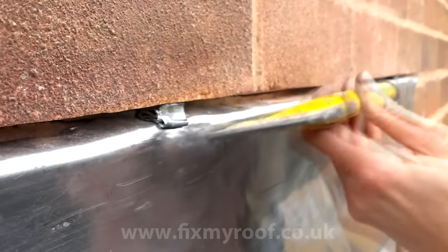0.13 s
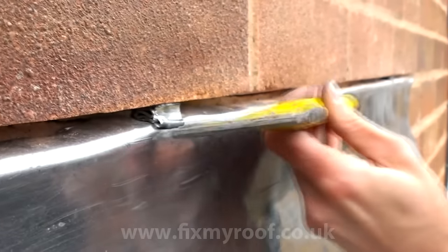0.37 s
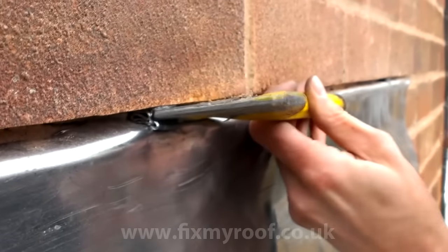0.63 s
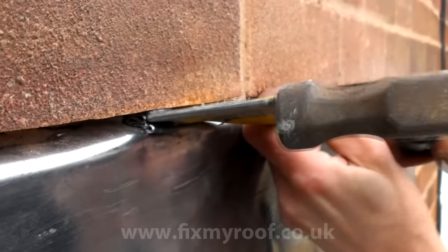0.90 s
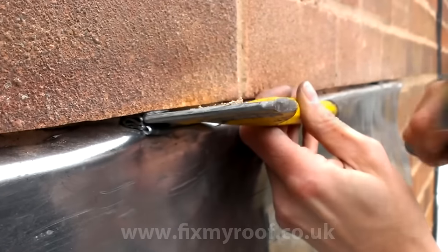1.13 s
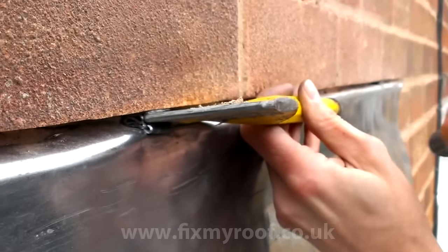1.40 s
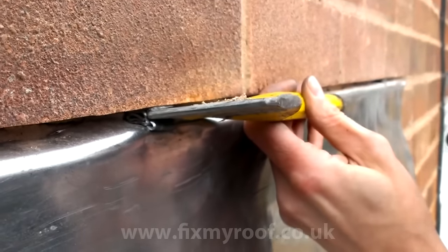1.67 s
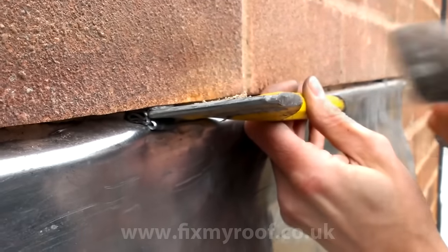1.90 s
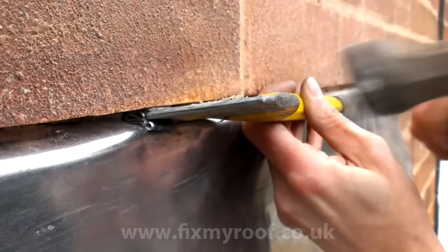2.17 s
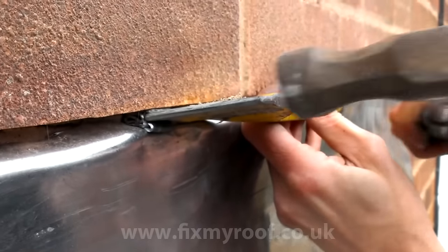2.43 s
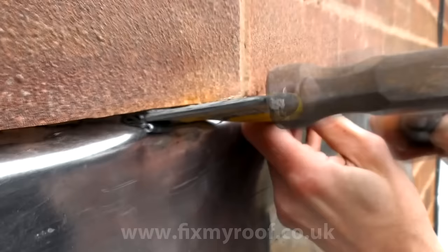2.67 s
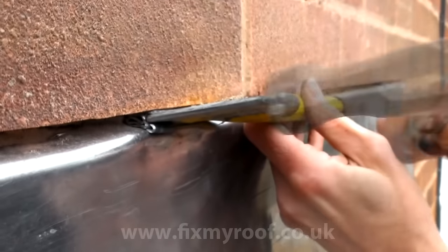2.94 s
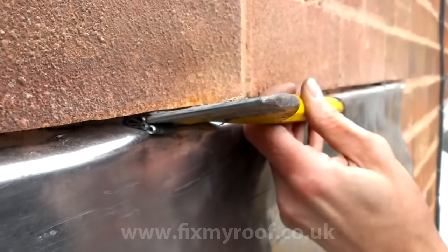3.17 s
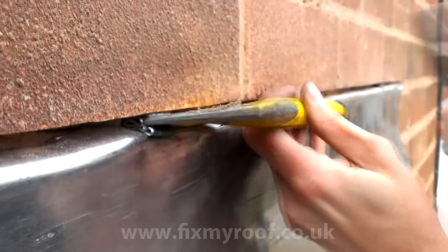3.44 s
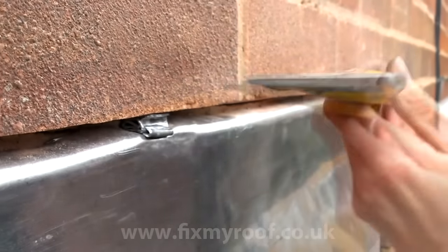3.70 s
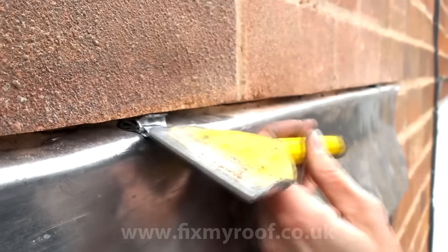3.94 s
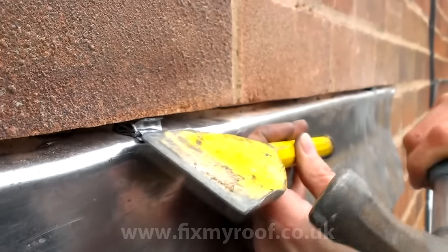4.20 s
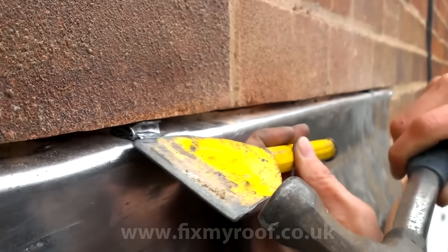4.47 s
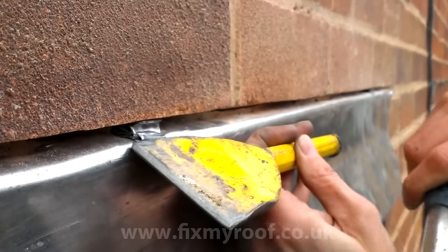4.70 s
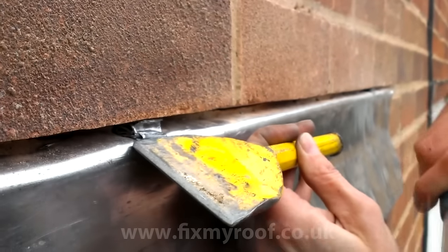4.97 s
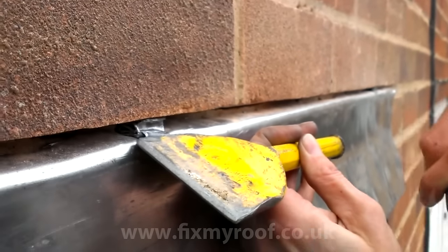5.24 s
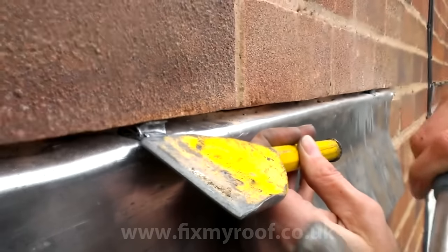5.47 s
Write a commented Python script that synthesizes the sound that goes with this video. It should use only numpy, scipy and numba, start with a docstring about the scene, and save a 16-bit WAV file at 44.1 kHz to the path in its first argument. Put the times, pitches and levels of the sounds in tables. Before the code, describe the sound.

Outdoors on a roof by a brick wall, heard close in one channel, over very faint distant traffic. From 0 to 0.4 s, soft dull hand bumps on sheet lead with light rubbing; around 0.7 s a short scrape and small blade taps on brick. At 0.96 s a hammer begins hitting a steel chisel, a blow every 0.3 s until 3.35 s: hard bright clack, short metallic ring, quick duller rebound, gritty mortar crunch and low roof thud. Small lead bumps sit between early blows. After 3.4 s echoes die into near quiet, with a faint tap at 3.6 s. From 4.15 to 4.85 s, low lead knocks and sliding rumble, with a stronger brick knock at 4.34 s. Three blows at 4.92, 5.19 and 5.47 s grow louder, more ringing and less thuddy. Short echoes return from nearby walls; loud peaks are compressed, and the background dips just before them.

```python
"""Hands knock softly on a lead sheet over far traffic hum; then a hammer drives a chisel into a brick joint on a roof.
Blows and rebounds ring steel modes (fading sine waves), shake the roof and crunch mortar, made of filtered noise.
The chisel alone also knocks the brick, and hands slide on the lead or drag the blade, as shaped noise.
Delayed copies and a fading noise tail give the echoes of nearby walls.
A look-ahead limiter holds the peaks down, so the background dips just before the loudest ones."""
import sys
import numpy as np
from scipy import signal
from scipy.fft import rfft, irfft
from scipy.io import wavfile
from scipy.ndimage import uniform_filter1d, minimum_filter1d
from numba import njit

SR = 44100
rng = np.random.default_rng(int(sys.argv[2]) if len(sys.argv) > 2 else 0)


def voltage_ratio(decibels):
    """Convert decibels (scalar or array-like) to amplitude ratios, 20 dB per decade."""
    exponent = np.asarray(decibels, float) / 20
    return 10 ** exponent


def persist_wave(psi):
    """Save psi, clipped to +-1, as 16-bit WAV."""
    counts = np.round(np.clip(psi, -1, 1) * 32767).astype(np.int16)
    wavfile.write(sys.argv[1], SR, np.atleast_2d(counts).T)


N = 246959  # length in samples


def colour(x, points):
    """Filter by (frequency in Hz, gain in dB) points, joined along a log frequency scale."""
    hz, db = np.transpose(points)
    n = x.shape[-1]
    f = np.maximum(np.arange(n // 2 + 1) * SR / n, 1)
    gain = voltage_ratio(np.interp(np.log(f), np.log(hz), db))
    return irfft(rfft(x) * gain, n)


def unit(x):
    """Scale to an rms (average strength) of 1."""
    return x / np.sqrt(np.mean(x ** 2))


def fade(t, t60):
    """Exponential decay that falls 60 dB in t60 seconds."""
    return np.exp(-np.log(1000) * t / t60)


def add(track, s, sound):
    """Mix a sound into the track at s seconds, cut off at the track's end."""
    start = int(s * SR)
    part = track[..., start:start + sound.shape[-1]]
    part += sound[..., :part.shape[-1]]


def walk(rate):
    """Random curve that moves to a new level rate times a second; its spread is about 1."""
    k = int(SR / rate)
    levels = np.repeat(rng.standard_normal(N // k + 1), k)
    return unit(uniform_filter1d(levels, k)[:N])


def along(strokes, rise_s, fall_s):
    """Gain over time: each (start, length, dB) stroke rises, holds and falls away."""
    t = np.arange(N) / SR
    gain = np.zeros(N)
    for s, length, db in strokes:
        before = np.maximum(s - t, 0) / rise_s
        after = np.maximum(t - s - length, 0) / fall_s
        gain += voltage_ratio(db) * np.exp(-before ** 2 - after ** 2)
    return gain


def dull(x, db):
    """A longer contact loses db per octave above 4200 Hz; a negative value brightens."""
    x = np.pad(x, [(0, 0), (64, 64)])  # room for the filter to spread
    return colour(x, [(20, 0), (4200, 0), (16800, -2 * db), (22050, -2 * db)])[:, 64:]


def ring(modes, seconds, life, scatter_db, detune, cycles):
    """One strike on a set of modes; each lands elsewhere, so levels, pitch and phase differ a little."""
    t = np.arange(int(seconds * SR)) / SR
    hz, db, t60 = np.array(modes).T[:, :, None]
    level, pitch, phase = rng.standard_normal((3, len(modes), 1))
    # tools move in the hand, so each ring wavers as it dies
    steps = rng.standard_normal((len(modes), len(t) // 400 + 1))
    waver = uniform_filter1d(np.repeat(steps, 400, axis=1), 400)[:, :len(t)]
    waver = waver * np.minimum(t / .06, 1)
    waves = np.sin(2 * np.pi * hz * (1 + detune * pitch) * t + phase)
    waves = waves * fade(t, life * t60) * voltage_ratio(db + scatter_db * (level + 2 * waver))
    # build-up takes the same number of cycles in every mode: the treble speaks first
    waves = waves * (1 - np.exp(-t * hz / cycles)) ** 2
    return waves.sum(axis=0) / np.sqrt(np.sum(voltage_ratio(2 * db)))


def town():
    """Distant traffic: noise in broad bands that swell slowly together and flicker a little alone."""
    # Tone of the hum. Each row: frequency in Hz, relative level in dB.
    hum_tone = [(24, -63), (70, -25), (140, -2.5), (542, -6), (600, -6), (965, -3), (1150, -7),
                (1950, -24.5), (4680, -21.5), (6820, -26), (16000, -27)]
    level_db = -68
    hum = rfft(unit(colour(rng.standard_normal(N), hum_tone)))
    f = np.arange(N // 2 + 1) * SR / N
    swell = walk(0.69)
    out = 0
    for lo, hi in [(20, 200), (200, 500), (500, 1300), (1300, 3500), (3500, 18000)]:  # Hz
        band = irfft(hum * ((f >= lo) & (f < hi)), N)
        out = out + band * voltage_ratio(0.27 * swell + 2.0 * walk(6.8))
    return voltage_ratio(level_db) * out


def walls(x):
    """Sound returns as a few smeared echoes, strongest in the bass, and a diffuse tail between the houses."""
    # Echoes from nearby walls. Each row: delay in seconds, level in dB before the wall's tone.
    bounces = [(.052, -46), (.082, -26.5), (.165, -34.5), (0.216, -51.5)]
    # Tone of the tail between the houses. Each row: frequency in Hz, gain in dB.
    yard_tone = [(100, 5.5), (600, 8), (2000, 8.5), (4000, 2), (8000, 0), (16000, -6)]
    # Tone of the wall echoes. Each row: frequency in Hz, gain in dB.
    wall_tone = [(100, 7.5), (600, -5), (2400, -3.5), (3200, 0), (4000, -7), (4700, -7.5), (7000, -9),
                 (10000, -18.5), (16000, -23.5)]
    yard_db, yard_t60_s = -44.5, 0.94
    t = np.arange(int(.8 * SR)) / SR
    tail = rng.standard_normal(len(t)) * fade(t, yard_t60_s)
    tail = tail * (1 - np.exp(-t / .02)) / np.sqrt(SR / 100)
    echoes = np.zeros(len(t))
    for delay, db in bounces:
        scattered = 0.076 * rng.standard_normal(900) * fade(t[:900], 0.056)  # ledges and window frames
        add(echoes, delay, voltage_ratio(db) * np.append(1, scattered))
    response = voltage_ratio(yard_db) * colour(tail, yard_tone) + colour(echoes, wall_tone)
    return signal.fftconvolve(x, response)[:N]


def knocks():
    """A hand knocks the lead sheet: each soft bump rings three low modes that die quickly."""
    # Knocks on the lead. Each row: start in seconds, level in dB, nominal pitch in Hz.
    bumps = [(0.042, -27, 204), (0.079, -29, 215), (0.109, -27.5, 169), (0.149, -41, 148),
             (0.264, -25, 269), (0.29, -31.5, 204), (0.355, -39.5, 149), (1.034, -25.5, 174),
             (1.138, -36.5, 243), (1.402, -33, 145), (1.446, -24.5, 186), (1.486, -24, 192),
             (4.171, -38, 216), (4.244, -24.5, 187), (4.304, -24, 228.6), (4.316, -21, 177),
             (4.518, -25, 182), (4.64, -20, 253), (4.674, -22.5, 371), (4.699, -34.5, 360),
             (4.734, -21.5, 245), (4.769, -22, 236), (4.841, -30.5, 240)]
    out = np.zeros(N)
    for s, db, hz in bumps:
        sheet = [(hz, 0, .045), (1.4 * hz, -7, .04), (2.5 * hz, -16, .025)]
        add(out, s, voltage_ratio(db) * ring(sheet, 0.095, 0.91, 2.2, 0.029, 0.6))
    return out


def dragging():
    """The blade drags over brick and sleeves rustle: filtered noise with a quick grainy flutter."""
    # Drags and rustles. Each row: start in seconds, length in seconds, level in dB before the flutter.
    strokes = [(0.03, .03, -69), (0.095, 0.014, -71), (0.26, 0.034, -65), (0.7, 0.021, -44),
               (4.25, 0.097, -70)]
    tone = [(100, -20), (400, 27.5), (1500, 14.0), (3000, 2), (6000, 1.5), (16000, -4.5)]  # (Hz, dB)
    drag = unit(colour(rng.standard_normal(N), tone))
    return drag * voltage_ratio(4 * walk(300)) * along(strokes, rise_s=.004, fall_s=.012)


def sliding():
    """Palm and sleeve slide on the lead, which rumbles: low noise of uneven strength."""
    # Slides. Each row: start in seconds, length in seconds, level in dB before the unevenness.
    strokes = [(0.1, 0.21, -63), (1.4, 0.1, -52), (4.2, 0.071, -59.5), (4.3, 0.082, -50),
               (4.5, 0.066, -51.5), (4.64, 0.13, -47.5)]
    tone = [(60, -30), (130, -6), (230, 0), (400, -8), (900, -26), (3000, -50)]  # (Hz, dB)
    rumble = unit(colour(rng.standard_normal(N), tone))
    return rumble * voltage_ratio(3 * walk(40)) * along(strokes, rise_s=.03, fall_s=.025)


def crunch(db):
    """Mortar crumbles: a sharp crack, a grainy hiss that dies fast in the treble, crumbs rattling on lead."""
    # Tone of the grains. Each row: frequency in Hz, relative level in dB.
    grit_tone = [(35, -55.5), (60, -28), (553, 0.5), (2250, -15), (2770, -12), (3040, -8.5), (4030, -1),
                 (4750, -2), (5210, -5.5), (10300, -17), (16000, -67.5)]
    # Tone of the crack. Each row: frequency in Hz, relative level in dB.
    crack_tone = [(300, -11), (3000, -6.5), (9000, -6.5), (13000, -20), (16000, -21)]
    # Tone of the rattling crumbs. Each row: frequency in Hz, relative level in dB.
    rattle_tone = [(200, 11.5), (1000, 17), (2000, 0), (3800, 10.5), (7000, -3), (16000, -22)]
    t = np.arange(int(.3 * SR)) / SR
    uneven = voltage_ratio(2.25 * rng.standard_normal(len(t)))
    grains = unit(colour(rng.standard_normal(len(t)) * uneven, grit_tone))
    low = signal.lfilter([.2], [1, -.8], grains)
    hiss = (grains - low) * fade(t, 0.052) + low * fade(t, 0.16)
    crack = voltage_ratio(7.5) * unit(colour(rng.standard_normal(len(t)), crack_tone)) * fade(t, 0.009)
    patchy = voltage_ratio(4 * np.repeat(rng.standard_normal(len(t) // 100 + 1), 100)[:len(t)])
    crumbs = unit(colour(rng.standard_normal(len(t)) * patchy, rattle_tone))
    return voltage_ratio(db) * (crack + hiss + voltage_ratio(-26) * crumbs * fade(t, .5))


def contact(under, chisel_db, under_db, grit_db, freedom):
    """Two rows: the chisel's ring; then the grit with whatever lies under it, taking the push."""
    # Ringing notes of the chisel. Each row: frequency in Hz, relative level in dB,
    # time to fall 60 dB in seconds before freedom shortens it.
    chisel_modes = [(1114, -16.5, .1), (1317, -14, 0.18), (1550, -5.5, .08), (2742, 3.5, 0.13),
                    (3377, 1.5, 0.037), (4200, -7, .07), (5608, 6.5, 0.14), (6190, -9.5, 0.056),
                    (7346, -6.5, 0.15), (8790, -11, .14), (9776, -12, 0.2), (11330, -12, .15),
                    (12650, -13, .11), (14000, -15, .1)]
    grip_s = 0.17  # the hand closes on the chisel again and stops its ring
    chisel = ring(chisel_modes, .3, max(freedom, .1), 1.5, .0005, 2.5)
    chisel = chisel * np.exp(-(np.arange(len(chisel)) / (grip_s * SR)) ** 4)
    push = ring(under, .3, 0.73, 2.5, 0.04, 0.42)
    return np.array([voltage_ratio(chisel_db) * chisel, crunch(grit_db) + voltage_ratio(under_db) * push])


def touches():
    """The chisel alone touches the wall and knocks the brick with a little grit. Rows as in contact."""
    # Touches. Each row: start in seconds, brick knock in dB, chisel ring in dB before the blade's tone,
    # freedom to ring (1 is loose), dullness in dB per octave.
    taps = [(0.6663, -25.5, -54, 0.96, 0), (0.6987, -20, -37.5, 0.4, 16.5), (0.716, -33, -45.5, 0.47, 25),
            (3.6192, -28.5, -40.5, 0.5, -0.5), (4.3422, -12, -36, 0.49, 31), (4.418, -29, -47, 0.24, 41),
            (4.4911, -26.5, -38, 0.84, 5.5), (4.6375, -39.5, -79, 0.36, 26), (4.673, -34, -66, .4, 25),
            (4.9973, -26, -35.5, 0.23, 24)]
    # Notes of the brick. Each row: frequency in Hz, relative level in dB,
    # time to fall 60 dB in seconds before contact shortens it.
    brick_modes = [(363, 1, 0.16), (691.4, 8.5, 0.094), (958, 21, 0.0096), (1180, -4, 0.049),
                   (1500, -11, 0.01), (1950, -6.5, 0.075), (4170, -7.5, 0.053)]
    # Touched at the blade, the modes share the ring differently. Each row: frequency in Hz, gain in dB.
    tip_tone = [(1500, 16.5), (2742, 4.5), (5608, -13), (7346, 5), (9700, -13)]
    grit_under_knock_db = -29
    out = np.zeros((2, N))
    for s, brick_db, chisel_db, freedom, dull_db in taps:
        touch = contact(brick_modes, chisel_db, brick_db, brick_db + grit_under_knock_db, freedom)
        touch[0] = colour(touch[0], tip_tone)
        add(out, s, dull(touch, dull_db))
    return out


def hammering():
    """Blows and rebounds, steel on steel, ring head and chisel and shake the roof. Rows as in contact."""
    # Blows and rebounds. Each row: start in seconds, strength in dB, chisel ring in dB above that,
    # dullness in dB per octave (more for a softer contact),
    # boost of the head's main note in dB (strongest when the face lands squarely).
    blows = [(0.9560, -6.5, -15.5, 3, 5), (1.007, -28.5, -12, 10.5, 2.5), (1.2640, 0, -21, -4, 8),
             (1.311, -6, -16.5, 5, -1.5), (1.5630, -2, -18, -1, 2.5), (1.6007, -5, -22.5, 9, -5.5),
             (1.8626, 0, -23, -2.5, 2.5), (1.891, -4.5, -16, 7.5, 2.5), (2.153, 0.5, -25.5, -2.5, -2),
             (2.184, -1, -13, 5.5, -4.5), (2.4570, 0.5, -28.5, -2, 1.5), (2.484, -2.5, -22.5, 10, 3.5),
             (2.7484, 0, -14, -1.5, 2), (2.7708, -1.5, -14.5, 10, 6), (2.7867, -10, -7.5, 22, 6.5),
             (3.0444, 0.5, -15, 0, -10), (3.076, -0.5, -22, 11.5, -3.5), (3.098, -31.5, -15.5, 7, -8),
             (3.3520, 2.5, -21.5, -0.5, -1), (3.3772, -1, -8, 8.5, 4.5), (3.3958, -21, 4.5, 11.5, 7),
             (4.9162, -9, -9, 7.5, 8.5), (4.9598, -16.5, -10, 13, -2.5), (5.1945, -3.5, -8, 6, 0.5),
             (5.227, -11.5, -3, 7, 1), (5.4740, -1, -7, 4, 4), (5.5103, -8, -11.5, 9.5, -3)]
    # How the blade sits. Each row: time in seconds, freedom to ring (1 held loosely, less when wedged),
    # roof thud in dB under the blow, grit in dB under the blow before dullness softens it.
    seat = [(0.95, 0.46, -13.5, -18), (1.27, 0.49, -12.5, -16), (3.4, 0.25, -11, -12),
            (4.9, 0.47, -20, -14), (5.2, 0.73, -22.5, -19.5)]
    # Notes of the hammer head. Each row: frequency in Hz, relative level in dB before the main note's boost,
    # time to fall 60 dB in seconds.
    head_modes = [(3916, 3, 0.032), (4079, -1.5, 0.032), (4380, 12, 0.011), (4707, 3, 0.053),
                  (4624, -3.5, 0.061), (4645, -36.5, 0.33), (6140, -14.5, 0.016), (6910, -6, 0.013),
                  (7900, -14, 0.057), (10000, -10, 0.061), (10200, -42.5, 0.23), (13700, -27, 0.03)]
    # Notes of the roof. Each row: frequency in Hz, relative level in dB,
    # time to fall 60 dB in seconds before contact shortens it.
    roof_modes = [(42, -13.5, 0.051), (154, -19, 0.55), (223.5, 3, 0.18), (274.7, -2.5, 0.13),
                  (318.7, -3.5, 0.32), (356, -8.5, 0.27), (515.5, 8.5, 0.084), (608, -15.5, 0.041),
                  (665, 8, 0.083), (753, 4.5, 0.061), (885, -15, 0.061), (1119, 2, 0.1), (1426, -6.5, 0.16),
                  (1832, -0.5, 0.082)]
    main_low_hz, main_high_hz = 4500, 4900
    soft_grit = 0.34  # dB less grit for each dB per octave of dullness
    seat_s, *seat_columns = np.transpose(seat)
    out = np.zeros((2, N))
    for s, db, chisel_db, dull_db, note_db in blows:
        freedom, roof_db, grit_db = (np.interp(s, seat_s, column) for column in seat_columns)
        blow = contact(roof_modes, chisel_db, roof_db, grit_db - soft_grit * dull_db, freedom)
        modes = [(hz, d + note_db * (main_low_hz < hz < main_high_hz), t60) for hz, d, t60 in head_modes]
        head = ring(modes, .45, 1, 1.9, .0008, 3.0)
        add(out, s, voltage_ratio(db) * dull(blow, dull_db))
        add(out[1], s, voltage_ratio(db) * dull(head[None], dull_db)[0])
    return out


def scene():
    """Work, its echoes and the town, in one channel."""
    chisel_to_walls_db = -8  # the blade points into the joint and throws little towards the houses
    chisel, rest = hammering() + touches()
    rest = rest + knocks() + dragging() + sliding()
    echoes = walls(rest + voltage_ratio(chisel_to_walls_db) * chisel)
    return (chisel + rest + echoes + town())[None]


@njit
def recover(gain, step):
    """The gain drops at once and creeps back up."""
    out, g = np.empty(len(gain)), 1.
    for i in range(len(gain)):
        g = min(gain[i], g + (1 - g) * step)
        out[i] = g
    return out


def roll_off(x):
    """The treble ends steeply here."""
    return signal.sosfilt(signal.butter(12, 16980, fs=SR, output="sos"), x)


def record(dry):
    """The top is cut; the limiter looks ahead, so the background dips just before loud peaks, and rounds them."""
    top_hz, ceiling_db = 15700, -9
    ahead_s, release_s = 0.021, 0.018
    x = signal.sosfilt(signal.ellip(6, .3, 40, top_hz, fs=SR, output="sos"), dry)
    ahead, top = int(ahead_s * SR), voltage_ratio(ceiling_db)
    need = np.minimum(1, top / (np.abs(x[0]) + 1e-9))
    early = minimum_filter1d(need, ahead, origin=-(ahead // 2))  # lowest gain needed soon
    gain = recover(early, 1 / (release_s * SR))
    gain = uniform_filter1d(gain, int(.002 * SR))
    mix = top * np.tanh(1.45 * x * gain / top)  # rounds the peaks
    return roll_off(mix)


dry = scene()
out = record(dry)
persist_wave(out)
```